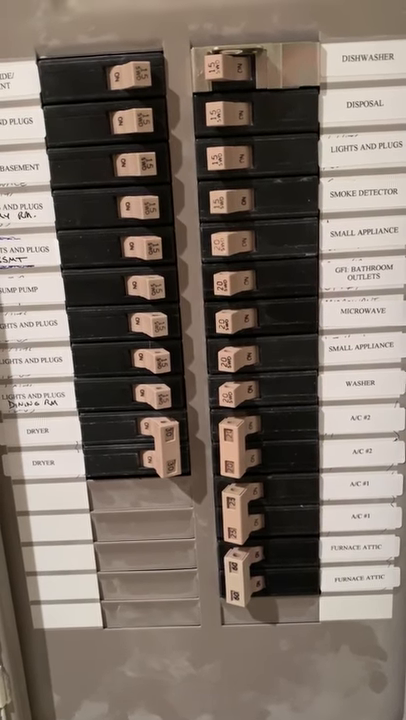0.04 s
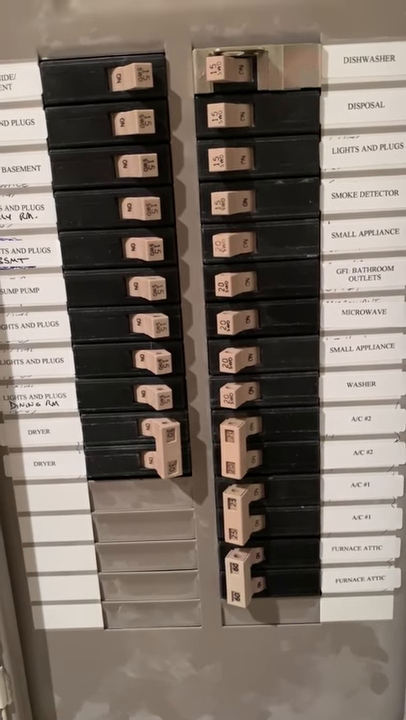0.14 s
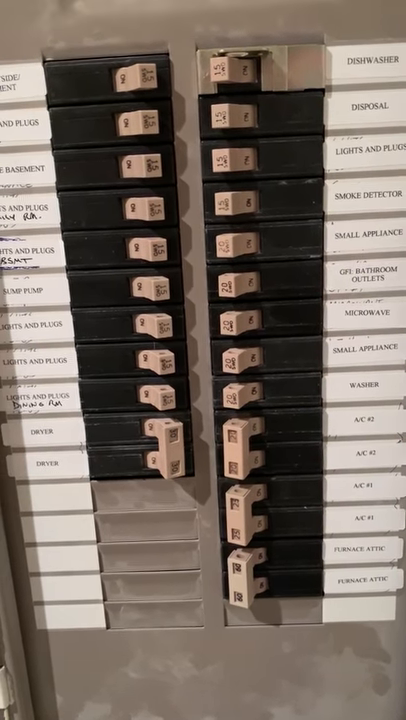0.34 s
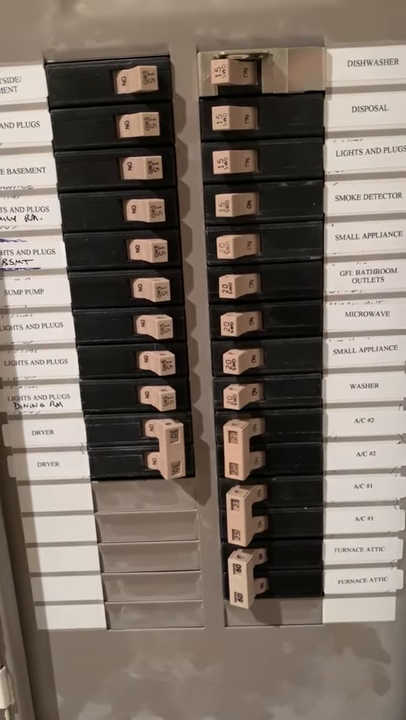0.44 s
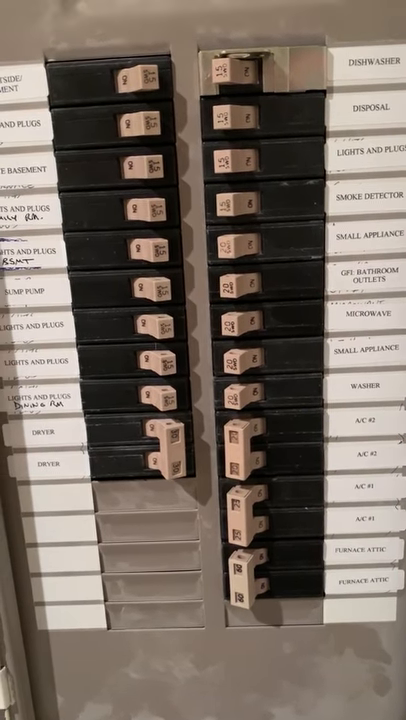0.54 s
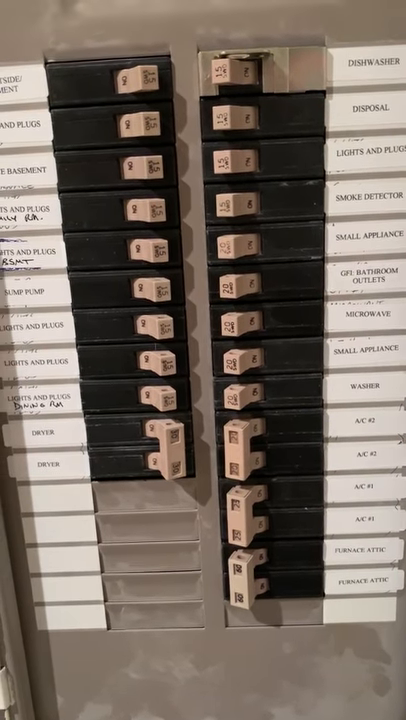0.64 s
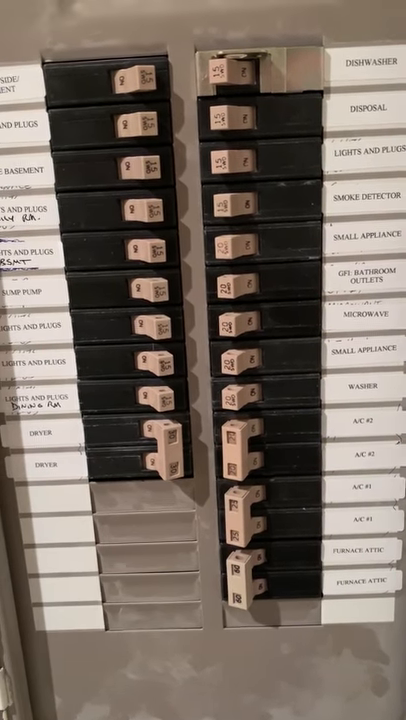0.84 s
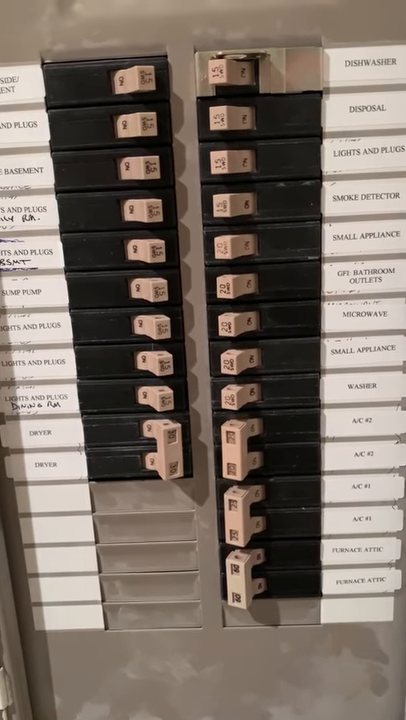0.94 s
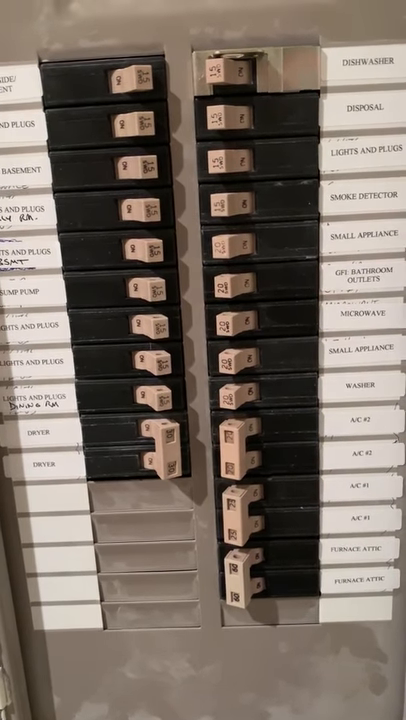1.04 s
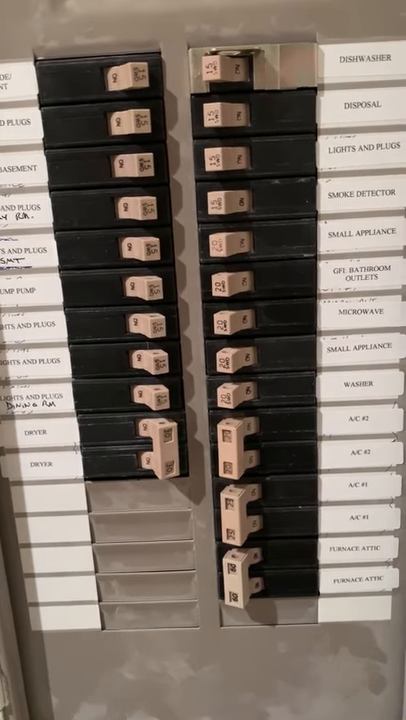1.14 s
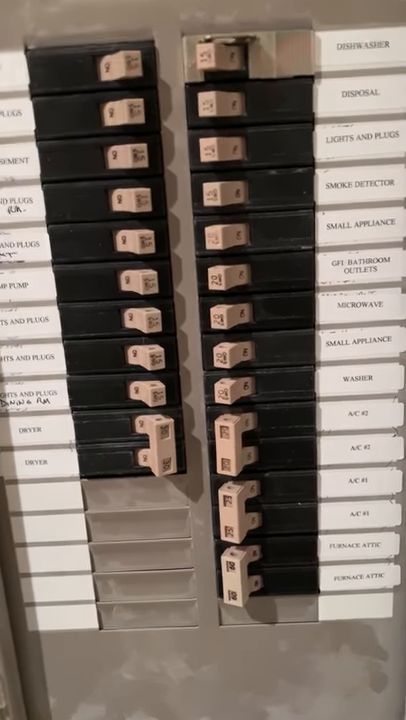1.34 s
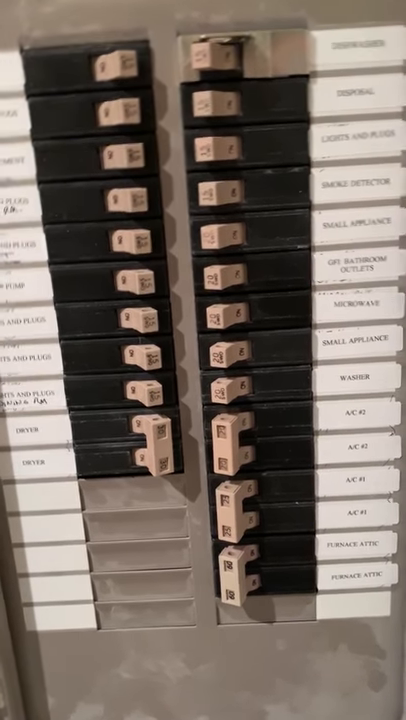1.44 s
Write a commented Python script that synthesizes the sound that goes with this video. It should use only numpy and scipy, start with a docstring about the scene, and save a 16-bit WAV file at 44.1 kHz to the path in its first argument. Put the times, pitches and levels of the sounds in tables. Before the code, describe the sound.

An electrical breaker panel, heard close in a quiet room with faint rumble and hiss. At about 0.2 seconds the breaker snaps on in a bright, clattering multi-part clunk that rings the steel box. From 0.26 a hard, rattling 120-hertz buzz over low hum settles, its sizzling top fading and returning. It stops dead near 0.97; a small latch clicks at 1.0, hum dies away, then a faint scuff and tiny knock around 1.2.

```python
"""A quiet room: rumble, air, hiss and a faint standing hum, all filtered noise and sines.
A breaker in a steel panel snaps on: a clattering clunk of noise bursts that rings the box's modes.
The current makes the panel hum (harmonic partials) and a loose part strike twice per mains cycle:
a hard buzz with a sizzling top, made of filtered pulses. The buzz stops dead, a small latch clicks
(noise bursts, struck modes) and the hum dies away; a faint scuff and a tiny knock follow."""
import sys
import numpy as np
from scipy import signal
from scipy.fft import rfft, irfft
from scipy.io import wavfile

SR = 44100
rng = np.random.default_rng(int(sys.argv[2]) if len(sys.argv) > 2 else 0)


def int16_out(signal):
    """Quantize to a 16-bit WAV file."""
    q = np.round(np.clip(np.atleast_2d(signal).T, -1, 1) * 32767)
    wavfile.write(sys.argv[1], SR, q.astype(np.int16))


N = 66150
T = np.arange(N) / SR
FFT_SIZE = 2 ** 17
HZ = np.arange(FFT_SIZE // 2 + 1) * SR / FFT_SIZE

BUZZ_HZ, PHASE_ZERO_S = 119.94, .2608
BUZZ_OFF_S, HUM_OFF_S = .973, 1.04


def from_db(db):
    """Decibels to gain."""
    return 10 ** (np.asarray(db) / 20)


def level(rows):
    """A (s, dB) curve as a gain per sample."""
    return from_db(np.interp(T, *np.transpose(rows)))


def colour(x, points):
    """Causal (minimum-phase) filter through (Hz, dB) points."""
    hz, db = np.transpose(points)
    gain = from_db(np.interp(np.log(HZ + 1), np.log(hz), db))
    # fold the cepstrum onto positive time: minimum phase
    cepstrum = irfft(np.log(gain))
    cepstrum[1:FFT_SIZE // 2] *= 2
    cepstrum[FFT_SIZE // 2 + 1:] = 0
    response = np.exp(rfft(cepstrum))
    return irfft(rfft(x, FFT_SIZE) * response)[..., :N]


def noise(spectrum):
    """Steady coloured noise."""
    return colour(rng.standard_normal(N), spectrum)


def fall(start_s, t60_s):
    """Silence, then an exponential decay."""
    return (T >= start_s) * 1000. ** (-np.maximum(T - start_s, 0) / t60_s)


def burst(start_s, t60_s):
    """Dense dying vibration of unit energy: decaying noise."""
    x = rng.standard_normal(N) * fall(start_s, t60_s)
    return x / np.sqrt(np.sum(x ** 2) + 1e-20)


def ring(start_s, modes):
    """Struck modes: decaying sines, each starting at a chance phase."""
    total = np.zeros(N)
    for hz, db, t60_s in modes:
        sine = np.sin(2 * np.pi * (hz * T + rng.random()))
        total += from_db(db) * fall(start_s, t60_s) * sine
    return total


def convolve(x, response):
    """Pass a sound through an impulse response."""
    return signal.fftconvolve(x, response)[:N]


# Noise floor spectra. Each row: frequency in Hz, level in dB.
RUMBLE = [(20, -49), (45, -40.5), (90, -48.5), (130, -47), (190, -56), (260, -57.5), (450, -76.5),
          (2000, -110)]
AIR = [(100, -73), (400, -72.5), (1200, -77), (3000, -79), (5000, -86.5), (15000, -100)]
HISS = [(300, -90.5), (2000, -92.5), (4000, -79.5), (8000, -80.5), (12000, -83.5), (15500, -82.5)]
# Floor level curves; the air dips briefly. Each row: time in seconds, level in dB.
RUMBLE_LEVEL = [(0, -1.5), (.3, -8.5), (.37, 15), (.55, 6), (.65, 7), (.85, 6.5), (1.02, 7), (1.18, -1.5),
                (1.3, 2), (1.4, -5.5), (1.5, 5)]
AIR_LEVEL = [(0, 4.5), (1.13, -0.5), (1.22, -18), (1.34, -28), (1.39, 0), (1.5, -4.5)]


def floor():
    """Low rumble and room air, both of varying level, and steady thin hiss."""
    rumble = level(RUMBLE_LEVEL) * noise(RUMBLE)
    air = level(AIR_LEVEL) * noise(AIR)
    return rumble + air + noise(HISS)


def hum_phase():
    """Phase in radians of the first hum partial, zero at PHASE_ZERO_S, just before the first strike."""
    return 2 * np.pi * BUZZ_HZ * (T - PHASE_ZERO_S)


# Faint standing hum. Each entry: level in dB rms, partials 1 and 2.
STANDING_DB = [-74, -82.5]


def standing_hum():
    """Two steady harmonic partials, present throughout."""
    phase = hum_phase()
    partials = sum(from_db(db) * np.cos(k * phase) for k, db in enumerate(STANDING_DB, 1))
    return np.sqrt(2) * partials  # rms to peak


# Blows of the mechanism.
# Each row: start in seconds, clatter level in dB before CLUNK_DB, t60 in seconds, push on the box in dB.
BLOWS = [(.2125, -12, 0.086, -19.5), (.2163, -10, .04, -16), (0.2229, -4, 0.041, -4.5),
         (0.2309, -1.5, .06, -4), (0.2383, -4.5, .07, -3), (.2538, -4.5, .04, -4),
         (.2625, -15.5, .04, -18.5)]
# Colour of a blow. Each row: frequency in Hz, gain in dB.
CLUNK = [(100, -36), (200, -8.5), (500, -8.5), (1000, -10), (1500, -10.5), (2300, 1.5), (2650, -0.5),
         (3200, 2), (4000, -0.5), (4950, 6.5), (5600, 4.5), (6500, 4.5), (7400, -1.5), (8450, 5.5),
         (9200, 0.5), (12500, 0), (14700, -11.5), (15550, 4.5), (16000, -21)]
# Ringing modes of the steel box. Each row: frequency in Hz, level in dB before the push, t60 in seconds.
PANEL = [(184, -43, .38), (212, -46, .25), (242, -43, .4), (305, -44, .38), (326, -38, .27), (472, -39, .2),
         (577, -41, .22), (730, -45, .17), (786, -45, .15), (2248, -39, .11), (2290, -38, .12),
         (2765, -42, .09), (3323, -36, .09), (6078, -42, .08), (6397, -40, .07), (6548, -39, .08)]
CLUNK_DB, CRACK_SHARE, CRACK_T60_S = 5, .25, .0032
BOX_LOW_CUT_HZ = 150  # keeps the abrupt mode starts free of bass thump


def clunk():
    """The mechanism lands in several blows, each a crack and a short clatter that sets the box ringing."""
    clatter = np.zeros(N)
    for start_s, clatter_db, t60_s, _ in BLOWS:
        blow = burst(start_s, t60_s) + CRACK_SHARE * burst(start_s, CRACK_T60_S)
        clatter += from_db(clatter_db) * blow
    box = sum(from_db(push_db) * ring(start_s, PANEL) for start_s, _, _, push_db in BLOWS)
    low_cut = signal.butter(4, BOX_LOW_CUT_HZ, "high", fs=SR, output="sos")
    return from_db(CLUNK_DB) * colour(clatter, CLUNK) + signal.sosfilt(low_cut, box)


# Hum partials 1-7. Each row: steady level in dB rms, extra swell at switch-on in dB rms.
HUM = [(-45, -45), (-64, -47), (-80, -68), (-72, -62), (-86, -82), (-78.5, -71), (-86, -64.5)]
# Bass modes of the room. Each row: frequency in Hz, peak level in dB, t60 in seconds.
BASS_MODES = [(125.3, -40, 0.41), (245, -65.5, 0.24)]
HUM_ON_S, HUM_RISE_S, HUM_T60_S, UPPER_T60_S = .256, .049, .051, .099
INRUSH_PEAK_S, INRUSH_WIDTH_S = .315, .032


def hum():
    """Partials of the magnetic pull swell with the inrush and hold; then the room's bass modes ring on."""
    phase = hum_phase()
    rise = np.clip((T - HUM_ON_S) / HUM_RISE_S, 0, 1)
    on = rise * np.where(T < HUM_OFF_S, 1, fall(HUM_OFF_S, HUM_T60_S))
    inrush = np.exp(-((T - INRUSH_PEAK_S) / INRUSH_WIDTH_S) ** 2)
    # partials 3 and up end with the buzz
    upper = np.where(T < BUZZ_OFF_S, 1, fall(BUZZ_OFF_S, UPPER_T60_S))
    driven = np.zeros(N)
    for k, (db, swell_db) in enumerate(HUM, 1):
        gain = from_db(db) + from_db(swell_db) * inrush
        driven += on * gain * np.cos(k * phase) * (1 if k < 3 else upper)
    # the modes take over in phase with the partials
    last_phase = np.interp(HUM_OFF_S, T, phase)
    free = np.zeros(N)
    for k, (hz, db, t60_s) in enumerate(BASS_MODES, 1):
        mode = np.cos(2 * np.pi * hz * (T - HUM_OFF_S) + k * last_phase)
        free += from_db(db) * fall(HUM_OFF_S, t60_s) * mode
    return np.sqrt(2) * driven + free * (1 - fall(HUM_OFF_S, HUM_T60_S))


def scatter(x, t60_s, share):
    """Random all-pass spreads each strike in time, colour unchanged; muted before the first pulse."""
    response = 1 + share * rfft(burst(0, t60_s), FFT_SIZE)
    all_pass = response / np.abs(response)
    return irfft(rfft(x, FFT_SIZE) * all_pass)[:N] * (T > PHASE_ZERO_S)


STRIKE_LAG_S = .0003


def strikes(curve, spectrum, ring_t60_s, ring_share, rough, grit, jitter_s):
    """One strike per half mains cycle; all ring alike, with chance slip in time, strength and a little grit."""
    start_s = np.arange(PHASE_ZERO_S + STRIKE_LAG_S, BUZZ_OFF_S, 1 / BUZZ_HZ)
    slip, strength = rng.standard_normal((2, N))[:, :len(start_s)]
    start_s = start_s + jitter_s * slip
    # sinc pulses keep the timing finer than a sample
    taps = (start_s * SR).astype(int)[:, None] + np.arange(-8, 9)
    pulses = np.zeros(N)
    pulses[taps] = np.sinc(taps - start_s[:, None] * SR) * (1 + rough * strength[:, None])
    pulses = pulses * level(curve)
    body = scatter(pulses, ring_t60_s, ring_share)
    # grit: noise that follows the decaying energy of the strikes
    spread = fall(0, ring_t60_s) ** 2
    energy = np.abs(convolve(pulses ** 2, spread / spread.sum()))
    grains = np.sqrt(energy) * rng.standard_normal(N)
    return colour(body + grit * grains, spectrum)


# Levels of the steady buzz, the chatter while the part settles, and the sizzling top.
# Each row: time in seconds, level in dB before the colour.
BUZZ_LEVEL = [(.26, -23.5), (.4, -23), (.55, -21), (.61, -23.5), (.75, -21.5), (.97, -20.5)]
CHATTER_LEVEL = [(.26, -13), (.31, -14.5), (.4, -17), (.53, -20), (.6, -28), (.7, -29), (.8, -36),
                 (.97, -30.5)]
SIZZLE_LEVEL = [(.26, -14), (.35, -31), (.43, -19.5), (.52, -17.5), (.555, -20), (.585, -32), (.68, -37),
                (.73, -24.5), (.83, -18), (.97, -15.5)]
# Their colours. Each row: frequency in Hz, gain in dB.
BUZZ = [(700, -12.5), (960, -41), (1200, -5), (1440, -29), (1700, -1), (1820, 0), (2040, -23), (2280, 3.5),
        (2400, -6.5), (2580, -11.5), (2760, 4), (3020, -13), (3250, -4.5), (3650, -19), (4100, -0.5),
        (4550, 3.5), (5300, 2), (5800, -13), (6700, -6.5), (7800, -30), (8400, -6), (9100, -34.5),
        (11000, -41), (16000, -41.5)]
CHATTER = [(800, -26), (1000, -33), (1500, -18), (2000, -7.5), (2270, 3.5), (2620, -13.5), (3300, -7.5),
           (3800, -8), (4800, -12), (5600, -8), (6500, -3), (7400, -9), (8500, -9.5), (9200, -17.5),
           (10200, -24), (11000, -31), (14000, -39), (16000, -44.5)]
SIZZLE = [(3000, -31.5), (6800, -12), (7500, -1.5), (7900, -8), (8400, -4), (9000, -22), (10000, -42.5),
          (11500, -29.5), (12000, -18.5), (12500, -10.5), (12950, -24), (13400, -14), (14000, -43.5),
          (16000, -40.5)]


def buzz():
    """Three strike trains: the steady buzz, its loose early chatter and the sizzle that comes and goes."""
    steady = strikes(BUZZ_LEVEL, BUZZ, ring_t60_s=.03, ring_share=1.1,
                     rough=.04, grit=.3, jitter_s=3e-6)
    chatter = strikes(CHATTER_LEVEL, CHATTER, ring_t60_s=.06, ring_share=1.5,
                      rough=.12, grit=.35, jitter_s=1.5e-5)
    sizzle = strikes(SIZZLE_LEVEL, SIZZLE, ring_t60_s=.014, ring_share=.52,
                     rough=.06, grit=.11, jitter_s=2e-6)
    return steady + chatter + sizzle


# Contacts of the latch. Each row: start in seconds, level in dB before the colour, t60 in seconds.
LATCH = [(.998, -17, 0.01), (1.0008, -11.5, 0.016), (1.004, -18, 0.041)]
# Colour of the contacts. Each row: frequency in Hz, gain in dB.
LATCH_COLOUR = [(200, 2.5), (900, -16), (1900, -17), (2350, 5), (2900, -6.5), (3600, -13.5), (4900, -8),
                (6000, -21), (8300, -22.5), (9500, -28), (15000, -44)]


def latch_clicks():
    """Contacts of the latch click as short noise bursts."""
    clicks = sum(from_db(db) * burst(start_s, t60_s) for start_s, db, t60_s in LATCH)
    return colour(clicks, LATCH_COLOUR)


# Modes of the latch. Each row: frequency in Hz, peak level in dB, t60 in seconds.
LATCH_RING = [(328.7, -58, 0.2), (1150, -73.5, 0.66), (1854, -60.5, 0.15), (2680, -68, 0.054),
              (3123, -60, 0.087)]


def latch_ring():
    """The second contact sets the modes of the latch ringing."""
    return ring(LATCH[1][0], LATCH_RING)


# Scuff spectrum. Each row: frequency in Hz, level in dB before SCUFF_DB.
SCUFF = [(900, -18), (2700, -20), (3100, 4.5), (3400, -10), (4200, -33), (9000, -45)]
SCUFF_S, SCUFF_HALF_LENGTH_S, SCUFF_DB = 1.18, .03, -59


def scuff():
    """Faint coloured noise under a flat-topped swell."""
    swell = np.exp(-((T - SCUFF_S) / SCUFF_HALF_LENGTH_S) ** 4)
    return from_db(SCUFF_DB) * swell * noise(SCUFF)


# Knock colour. Each row: frequency in Hz, gain in dB.
KNOCK = [(100, -9), (380, 10), (900, -31), (2200, -9), (4000, -2), (6000, -6), (12000, -25)]
KNOCK_S, KNOCK_DB, KNOCK_T60_S = 1.2365, -44, .014  # level before the colour


def knock():
    """A tiny coloured burst of decaying noise."""
    return from_db(KNOCK_DB) * colour(burst(KNOCK_S, KNOCK_T60_S), KNOCK)


# Colour of the room tail. Each row: frequency in Hz, gain in dB.
ROOM = [(100, -3.5), (250, 1.5), (700, 13), (2500, 1), (6000, -12), (10000, -12), (16000, -13)]
ROOM_DELAY_S, ROOM_T60_S, ROOM_DB = .0069, .29, -14.5  # level before the colour


def room(x):
    """A faint, dull tail: convolution with delayed, decaying noise."""
    tail = convolve(x, burst(ROOM_DELAY_S, ROOM_T60_S))
    return from_db(ROOM_DB) * colour(tail, ROOM)


ROOM_SIDE_DB, EARLY_SIDE_DB, FLOOR_SIDE_DB, EARLY_T60_S = -3.5, -17, -15, .05


def scene():
    """The panel straight ahead; reflections, room and floor add a little width."""
    panel = clunk() + buzz() + latch_clicks() + scuff() + latch_ring() + knock()
    mid = panel + standing_hum() + hum() + room(panel) + floor()
    # fresh noise draws make the sides differ
    side = from_db(ROOM_SIDE_DB) * room(panel)
    side += from_db(EARLY_SIDE_DB) * convolve(panel, burst(0, EARLY_T60_S))
    side += from_db(FLOOR_SIDE_DB) * floor()
    return np.array([mid + side, mid - side])


WIDEN_LAG_S, WIDEN_FROM_HZ, WIDEN_KNEE_HZ = .000242, 2920, 800
CUTOFF_HZ = 15800


def record(dry):
    """Stereo widening: both channels in step in the bass, the left leads in the treble; the top is cut."""
    # softplus: phase difference near zero well below WIDEN_FROM_HZ, growing linearly above
    lagging_hz = WIDEN_KNEE_HZ * np.logaddexp(0, (HZ - WIDEN_FROM_HZ) / WIDEN_KNEE_HZ)
    phase = 2 * np.pi * WIDEN_LAG_S * lagging_hz
    widening = np.exp(.5j * np.array([phase, -phase]))
    top = 1 / np.sqrt(1 + (HZ / CUTOFF_HZ) ** 240)
    return irfft(rfft(dry, FFT_SIZE) * widening * top)[:, :N]


dry = scene()
out = record(dry)
int16_out(out)
```